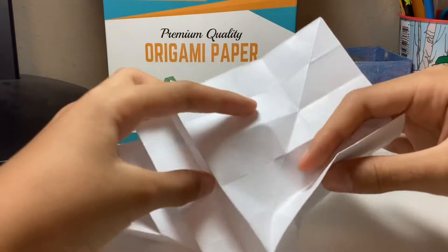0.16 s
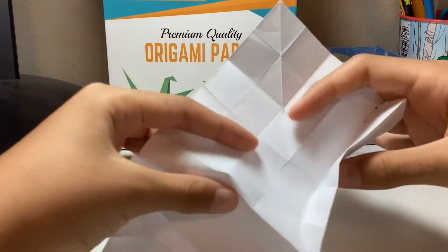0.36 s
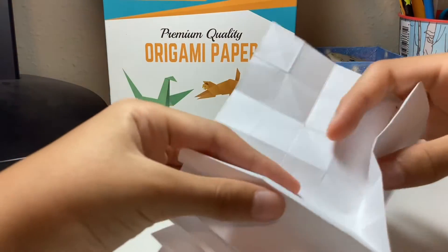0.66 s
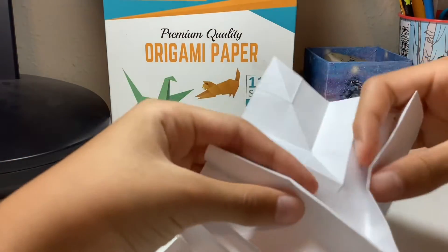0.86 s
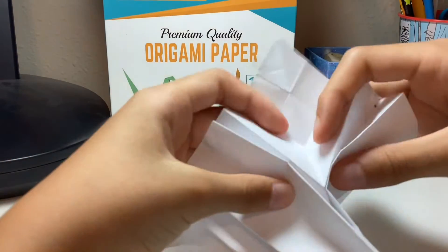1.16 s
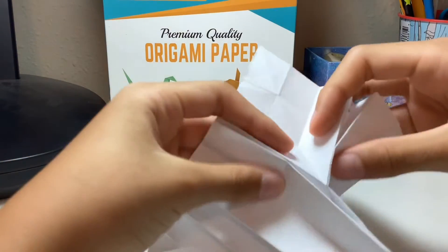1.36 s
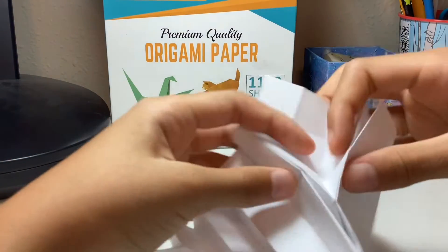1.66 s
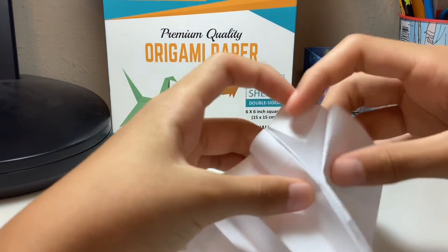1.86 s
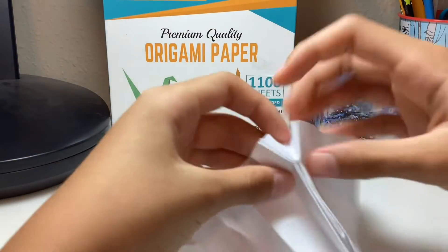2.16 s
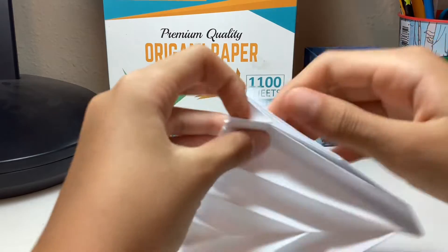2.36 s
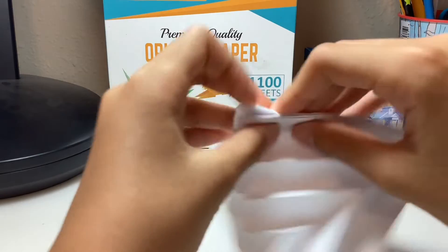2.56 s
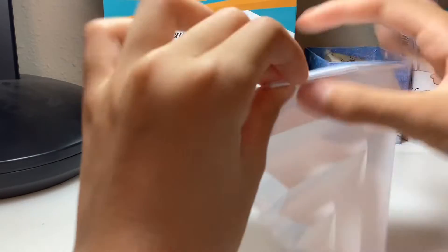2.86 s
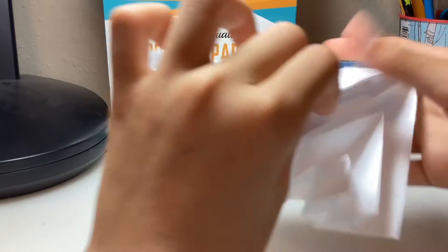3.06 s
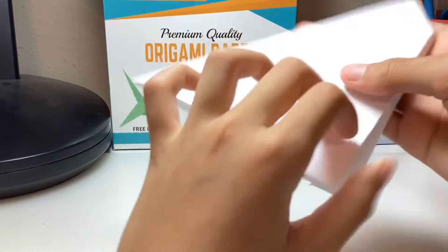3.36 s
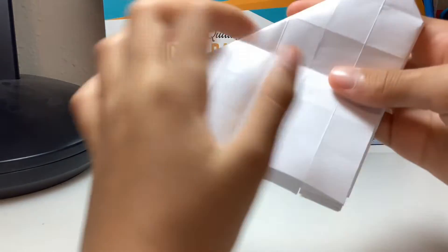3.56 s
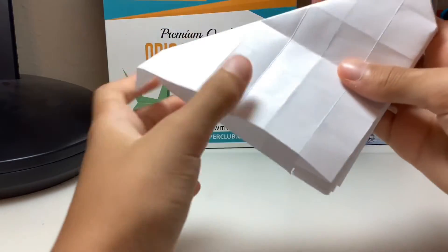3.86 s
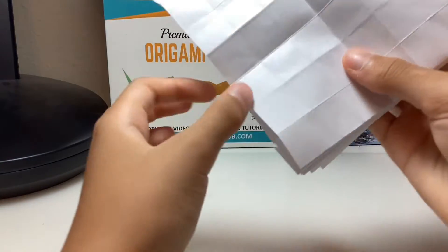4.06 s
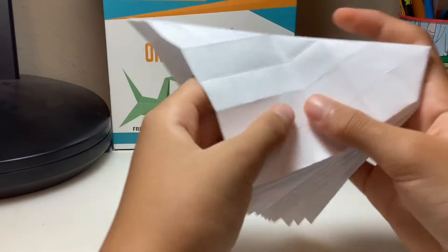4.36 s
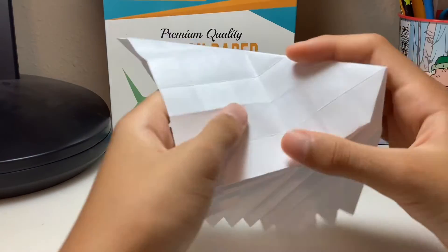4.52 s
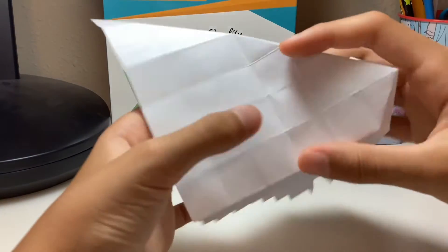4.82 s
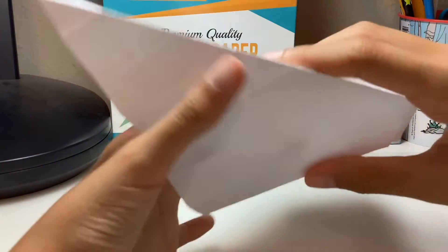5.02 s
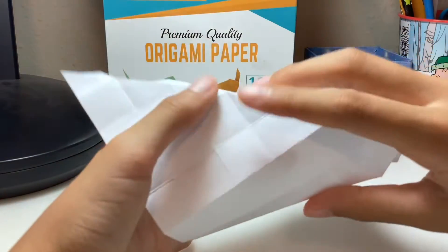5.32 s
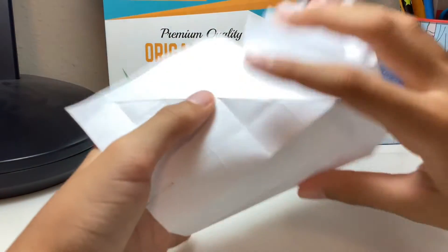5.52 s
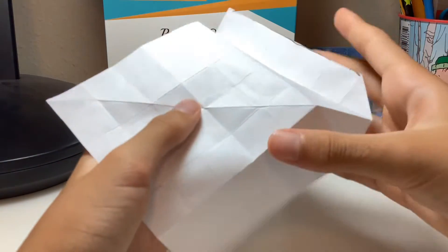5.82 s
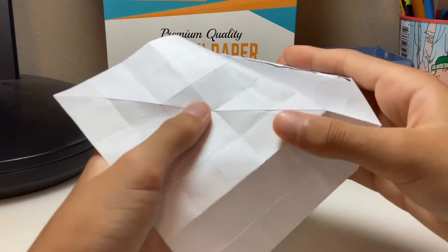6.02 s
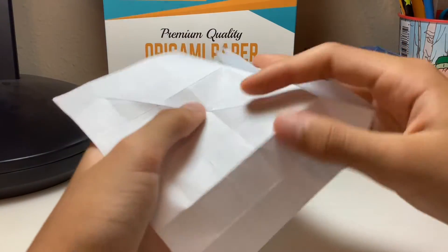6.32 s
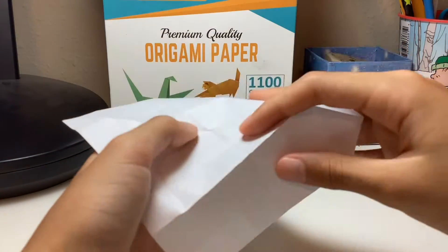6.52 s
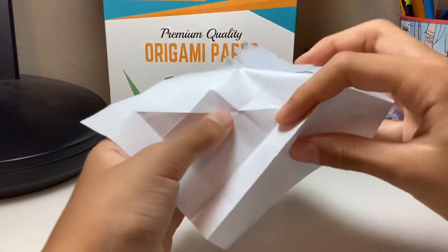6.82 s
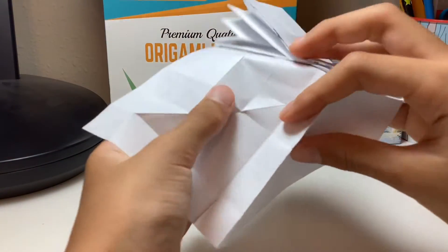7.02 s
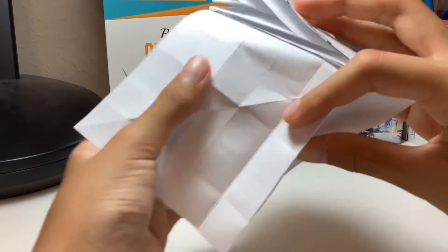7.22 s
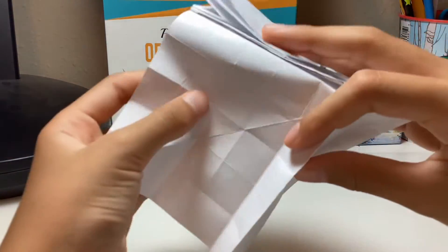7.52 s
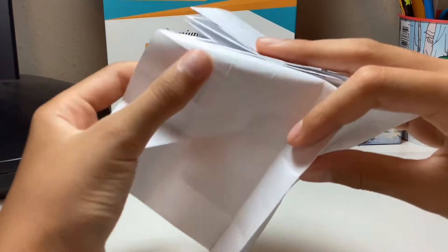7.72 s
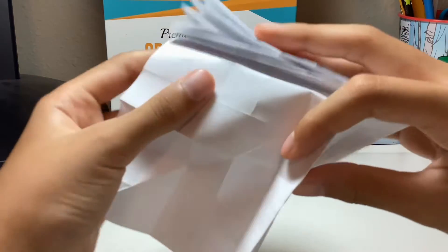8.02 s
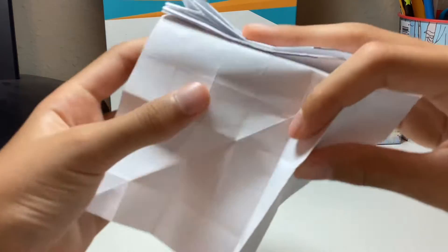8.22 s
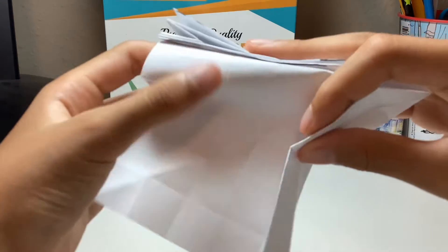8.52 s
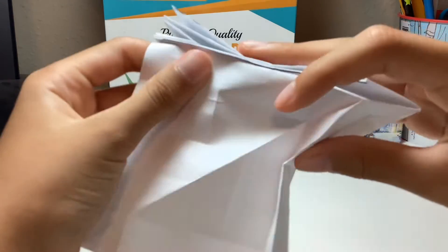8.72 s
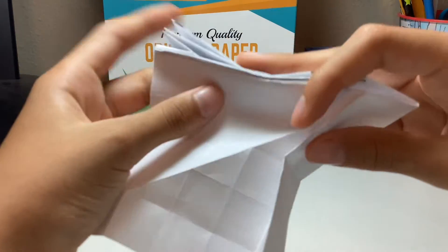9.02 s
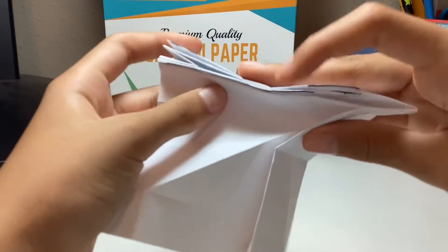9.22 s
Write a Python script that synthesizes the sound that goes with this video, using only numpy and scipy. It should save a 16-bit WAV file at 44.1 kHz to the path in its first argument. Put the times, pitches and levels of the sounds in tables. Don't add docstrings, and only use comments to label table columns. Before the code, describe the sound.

Close, dry, mono sound of hands creasing a layered sheet: fingertip hiss, rustling layers, papery ticks and hard bright snaps. Activity is dense for three seconds, eases to near quiet around four, returns with crackle clusters around five, single snaps at six and seven, then the strongest flurry after eight. Very faint low mains hum and room air beneath.

```python
import sys
import numpy as np
from scipy import signal
from scipy.fft import rfft, irfft
from scipy.io import wavfile
from scipy.ndimage import uniform_filter1d

SR = 44100
rng = np.random.default_rng(int(sys.argv[2]) if len(sys.argv) > 2 else 0)


def makeup_ratio(level_db):
    decades = np.asarray(level_db, float) / 20
    return 10 ** decades


def int16_out(signal):
    q = np.round(np.clip(np.atleast_2d(signal).T, -1, 1) * 32767)
    wavfile.write(sys.argv[1], SR, q.astype(np.int16))


N = 413658


def curve(table, hz):
    table_hz, table_db = np.transpose(table)
    return np.interp(np.log(hz + 1), np.log(table_hz), table_db)


def unit(x):
    return x / np.sqrt(np.mean(x ** 2))


def colour(x, db_of):
    size = 4096
    cepstrum = irfft(db_of(np.fft.rfftfreq(size, 1 / SR)) * np.log(10) / 20)
    cepstrum[1:size // 2] *= 2
    cepstrum[size // 2 + 1:] = 0
    impulse = irfft(np.exp(rfft(cepstrum)))
    return signal.fftconvolve(x, impulse)[:len(x)]


def band(x, low_hz, high_hz):
    return signal.sosfilt(signal.butter(2, [low_hz, high_hz], "band", fs=SR, output="sos"), x)


def walk(rate_hz):
    hold = int(SR / rate_hz)
    steps = np.repeat(rng.standard_normal(N // hold + 1), hold)
    return 1.28 * uniform_filter1d(steps, hold)[:N]


# centre_hz, width_hz, gain_db
PATH = [(600, 90, 7), (1050, 130, 6), (1335, 110, 10), (1480, 100, -5), (2140, 280, 8), (4480, 200, 5),
        (4800, 250, -4), (5350, 500, 4), (6040, 260, 7), (6260, 220, -8)]


def path_db(hz):
    return sum(db / (1 + (2 * (hz - centre) / width) ** 2) for centre, width, db in PATH)


# freq_hz, level_db
AIR_TILT = [(18, -31.5), (30, -30.5), (53, -13.5), (118, -2), (157, -7.5), (199, -15.5), (394, -30.5),
            (3770, -46.5), (16000, -67.5)]
# multiple, level_db
HUM = [(1, -62), (2, -71)]


def room_air():
    noise = colour(rng.standard_normal(N), lambda hz: curve(AIR_TILT, hz))
    air = unit(noise) * makeup_ratio(-59)
    hum_hz = 120
    phase = 2 * np.pi * hum_hz * np.arange(N) / SR + 0.8 * walk(12)
    for multiple, level_db in HUM:
        air = air + np.sqrt(2) * np.sin(multiple * phase) * makeup_ratio(level_db + 2.6 * walk(21))
    return air


# start_s, hiss_db
HOLDING = [(0.0, -73.5), (0.78, -60), (1.56, -60.5), (2.35, -64.5), (3.13, -68.5), (3.91, -78),
           (4.69, -66.5), (5.47, -72.5), (6.25, -74), (7.04, -68), (7.82, -67), (8.6, -69.5), (9.38, -67)]
# start_s, length_s, hiss_db
BENDS = [(0.0, 0.015, -59.5), (0.195, 0.12, -55), (0.314, 0.054, -55), (4.62, 0.096, -66),
         (5.054, 0.068, -57), (5.413, 0.075, -67), (5.517, 0.066, -61), (5.991, 0.056, -65),
         (6.111, 0.07, -65), (6.241, 0.07, -69.5), (6.585, 0.06, -70), (6.914, 0.044, -62.5),
         (6.989, 0.061, -65.5), (7.244, 0.073, -53), (7.328, 0.03, -55.5), (7.827, 0.086, -66),
         (7.982, 0.013, -59), (8.665, 0.025, -58), (8.69, 0.07, -53.5), (8.835, 0.038, -57.5)]
# start_s, length_s, hiss_db
DRAGS = [(0.065, 0.074, -59), (0.14, 0.023, -55), (8.826, 0.045, -56), (9.008, 0.008, -54),
         (0.364, 0.049, -55.5), (0.399, 0.1, -61.5), (0.698, 0.094, -53), (1.472, 0.14, -56.5),
         (1.956, 0.08, -53), (3.078, 0.12, -59), (3.228, 0.12, -56.5), (4.51, 0.054, -61),
         (4.854, 0.034, -55), (4.89, 0.035, -54.5), (4.922, 0.018, -51), (4.945, 0.02, -57),
         (4.964, 0.063, -63.5), (5.093, 0.044, -52), (5.218, 0.049, -55), (5.263, 0.071, -61.5),
         (5.343, 0.071, -57), (5.562, 0.093, -66.5), (5.907, 0.034, -62.5), (6.321, 0.025, -64),
         (6.495, 0.023, -62.5), (6.725, 0.07, -61), (7.383, 0.088, -56.5), (7.742, 0.081, -59.5),
         (8.122, 0.05, -53), (8.19, 0.018, -49.5), (8.222, 0.058, -53), (8.27, 0.21, -56),
         (8.312, 0.027, -47), (8.425, 0.07, -58), (9.184, 0.027, -60), (9.259, 0.081, -55.5)]
# start_s, length_s, hiss_db
RASPS = [
    (8.515, 0.044, -55),
    (0.203, 0.049, -53),
]
# start_s, length_s, hiss_db
SLIDES = [(0.489, 0.04, -52), (0.53, 0.06, -50.5), (0.6, 0.13, -50), (1.621, 0.091, -45.5),
          (2.085, 0.1, -51), (2.209, 0.024, -40), (2.335, 0.049, -46.5), (2.599, 0.125, -59.5),
          (2.859, 0.045, -58.5), (2.903, 0.023, -44.5), (3.357, 0.046, -49), (3.527, 0.039, -54),
          (3.577, 0.034, -59.5), (3.612, 0.032, -61), (3.92, 0.125, -59.5), (4.101, 0.132, -65),
          (4.245, 0.07, -59.5), (4.355, 0.19, -55.5), (5.637, 0.027, -53.5), (6.56, 0.025, -61),
          (6.815, 0.01, -43), (6.834, 0.059, -54), (6.969, 0.0205, -51), (7.159, 0.065, -54),
          (8.516, 0.036, -41), (8.561, 0.038, -47.5), (8.625, 0.029, -48.5), (8.87, 0.045, -52.5),
          (8.925, 0.015, -52), (8.95, 0.03, -52), (9.065, 0.05, -59.5), (4.68, 0.045, -63),
          (5.45, 0.02, -59.5), (9.234, 0.016, -41.5), (9.324, 0.054, -51)]
# start_s, length_s, hiss_db
STROKES = [(0.9, 0.023, -48.5), (0.935, 0.078, -53), (1.008, 0.02, -49), (1.045, 0.022, -51),
           (1.127, 0.15, -54.5), (1.287, 0.027, -46.5), (1.335, 0.06, -51), (1.4, 0.07, -49.5),
           (1.721, 0.065, -53.5), (1.786, 0.081, -50.5), (1.866, 0.15, -57.5), (2.24, 0.017, -55),
           (2.295, 0.067, -53), (2.39, 0.096, -57), (2.494, 0.029, -47), (2.53, 0.034, -45.5),
           (2.575, 0.024, -47.5), (2.724, 0.078, -53.5), (2.794, 0.071, -51), (3.018, 0.036, -52.5),
           (3.407, 0.15, -60), (4.285, 0.097, -63), (4.84, 0.03, -62.5), (5.473, 0.033, -66),
           (5.672, 0.12, -67), (6.346, 0.15, -54.5), (6.65, 0.077, -52), (6.884, 0.017, -49.5),
           (7.054, 0.048, -53.5), (7.495, 0.04, -52), (7.608, 0.078, -47), (7.683, 0.021, -56.5),
           (8.017, 0.12, -50), (8.341, 0.068, -53), (8.985, 0.012, -43.5)]


def contact():
    holding_rustle_db, attack_share, release_s, swell_db = 6, 0.16, 0.016, 1.5
    t = np.arange(N) / SR
    hiss = makeup_ratio(np.interp(t, *np.transpose(HOLDING)))
    rustle = hiss * makeup_ratio(holding_rustle_db)
    # events, rustle dB re hiss
    kinds = [(SLIDES, -2.2), (STROKES, 1), (DRAGS, 4.2), (BENDS, 8.9), (RASPS, 14.6)]
    for events, rustle_db in kinds:
        for start_s, length_s, hiss_db in events:
            attack_s = attack_share * length_s
            end_s = length_s + release_s
            span = slice(max(int((start_s - attack_s) * SR), 0), int((start_s + end_s) * SR))
            corners_s = [-attack_s, 0, length_s / 2, length_s, end_s]
            shape = np.interp(t[span] - start_s, corners_s, [0, 1, makeup_ratio(swell_db / 2), 1, 0])
            touch = makeup_ratio(hiss_db) * shape ** 2
            hiss[span] = np.maximum(hiss[span], touch)
            rustle[span] = np.maximum(rustle[span], touch * makeup_ratio(rustle_db))
    return 20 * np.log10([hiss, rustle])


# freq_hz, gain_db
RUB_TILT = [(100, -3.5), (250, 0.5), (900, -2.5), (3500, -1), (6100, -2), (6300, -4.5), (15500, -8.5)]


def rubbing():
    hiss_db, rustle_db = contact()
    smoothed_db = uniform_filter1d(rustle_db, 1200)
    flap_db = -40.5 + 0.57 * (smoothed_db + 52.5) + 2.6 * walk(35)
    grip_db = np.clip(walk(45) + 2.6 * walk(220), -8, 5)
    slips = makeup_ratio(np.minimum(3.3 * rng.exponential(size=N), 17) + grip_db - 6)
    crackles_per_s, crackle_base_db, crackle_spread_db = 120, 17, 3.0
    at = np.flatnonzero(rng.random(N) < crackles_per_s / SR)
    excess_db = np.minimum(crackle_spread_db * rng.exponential(size=len(at)), 9)
    crackle_db = crackle_base_db + excess_db
    centre = rng.uniform(np.log(500), np.log(9000), len(at))
    out = 0
    for hz in 160 * 1.17 ** np.arange(30):
        flap = np.interp(np.log(hz), np.log([450, 900]), [1, 0])
        hiss = np.interp(np.log(hz), np.log([2200, 5000]), [0, 1])
        level_db = flap * flap_db + hiss * (hiss_db + 7.0) + (1 - flap - hiss) * (rustle_db + 7.5)
        push = slips * rng.standard_normal(N)
        push[at] += makeup_ratio(crackle_db - 12 * (np.log(hz) - centre) ** 2)
        out = out + band(push, hz, 1.17 * hz) * makeup_ratio(level_db + 2.5 * walk(28))
    return colour(out, lambda hz: curve(RUB_TILT, hz) + 0.8 * path_db(hz))


def strike(size, peak_db, hz, t60_s, mode_db):
    t = np.arange(size) / SR
    rise_cycles = 0.85
    swell = (1 - np.exp(-t * hz / rise_cycles)) * np.exp(-np.log(1000) * t / t60_s)
    modes = np.sin(2 * np.pi * (hz * t + rng.random(hz.shape)))
    ring = np.sum(makeup_ratio(mode_db) * swell * modes, axis=0)
    return makeup_ratio(peak_db) * ring / np.abs(ring).max()


def lone_panel(size, peak_db, panel_hz):
    spread, cycles_to_t60 = 0.14, 17
    near, top = rng.random((2, 8, 1))
    panel_modes_hz = panel_hz * np.exp(spread * (2 * near[:4] - 1))
    hz = np.concatenate([panel_modes_hz, 3500 * 4.2 ** top])
    t60_s = cycles_to_t60 * (hz / 1000) ** 0.64 / hz
    crack_db = -11 if panel_hz > 3000 else -21.5
    mode_db = np.repeat([0, crack_db], [4, 8])[:, None]
    return strike(size, peak_db - 4, hz, t60_s, mode_db)


def big_snap(size, peak_db, peaks):
    hz, width_hz, gain_db = np.array(peaks, float).T[:, :, None]
    t60_s = np.log(1000) / (np.pi * width_hz)
    return strike(size, peak_db, hz, t60_s, gain_db + 20 * np.log10(width_hz))


# start_s, peak_db, panel_hz
LONE_PANELS = [(0.0, -33, 604), (0.608, -36, 623), (0.73, -33, 450), (0.852, -34, 650), (1.019, -39, 300),
               (1.264, -30.5, 603), (8.325, -23.5, 385), (1.339, -31, 505), (1.518, -33, 800), (1.951, -35, 350),
               (1.97, -28.5, 500), (2.161, -39, 300), (2.377, -38, 320), (2.817, -31, 560), (2.838, -33, 330),
               (2.919, -36, 330), (3.017, -32.5, 517), (3.17, -38, 600), (3.925, -38.5, 487), (4.5, -38, 1340),
               (4.871, -35, 330), (8.542, -13.5, 2230), (4.964, -33, 480), (5.045, -25, 490), (5.108, -28, 322),
               (5.282, -28, 1320), (6.246, -41, 640), (7.335, -31, 606), (7.439, -38, 647), (7.551, -24, 650),
               (7.771, -28, 350), (7.905, -33, 400), (8.073, -27, 660), (8.482, -34, 560), (8.703, -23, 600),
               (8.731, -32, 664),
               (0.063, -42, 1340), (0.098, -26, 1320), (0.118, -35, 2130), (0.681, -13.5, 2530),
                (1.059, -34, 1300), (1.327, -26, 1090), (1.496, -40, 1060), (1.635, -24, 940),
                (1.644, -26, 1030), (1.79, -30, 1330), (2.098, -34, 970), (2.327, -26, 5000),
                (2.348, -30, 4050), (2.381, -20.5, 5490), (3.082, -33.5, 1070), (3.154, -30, 2110),
                (3.231, -30, 2220), (3.524, -37, 1010), (3.642, -40.5, 820), (3.392, -29, 4000),
                (3.915, -27.5, 2120), (4.342, -40, 800), (4.414, -39, 1340), (4.679, -39, 750),
                (4.927, -29, 970), (5.008, -26.5, 5230),
               (5.48, -38, 2110), (5.507, -36, 2130), (5.625, -31.5, 2120), (5.858, -37, 1700),
               (6.235, -24.5, 1780), (6.575, -40, 2800), (6.783, -31, 1090), (6.924, -33, 1340),
               (7.127, -35, 2020), (7.219, -38, 1270), (7.301, -26, 1350), (7.395, -27, 2200),
               (7.693, -37, 2350), (7.596, -30, 650), (7.818, -22, 2200), (7.87, -32.5, 4720),
               (7.964, -40, 1310), (8.017, -12.5, 2200), (8.223, -33, 1200), (8.315, -21, 1090),
               (8.427, -34, 710), (8.449, -25, 1200), (8.575, -39, 1360), (8.69, -15, 2160),
               (8.993, -36, 1030), (9.054, -28, 2260), (9.106, -37, 1050),
               (0.121, -34, 300), (0.22, -26, 2140), (0.682, -35, 320), (0.699, -27, 616), (1.176, -34, 280),
          (1.598, -35, 250), (1.982, -34, 1900), (2.031, -31, 333), (2.222, -22, 3480), (2.494, -29, 260),
          (5.061, -22.5, 1905), (7.248, -32, 1300), (7.286, -27.5, 1900), (8.07, -29, 2000),
          (8.516, -16, 5900), (8.533, -23, 2300), (8.537, -24, 1900)]
# [(centre_hz, width_hz, gain_db)]
BIG_SNAPS = [
    (0.3213, -5.5, [(1380, 91, 2), (2090, 270, 0), (955, 100, -9), (10050, 1900, -14.5), (5900, 300, -7), (7700, 500, -14)]),
    (0.6804, -10, [(2100, 120, 0), (2530, 220, -1.5), (3290, 210, -16.5), (3470, 150, -17), (6040, 110, 0.5)]),
    (5.520, -19.5, [(602, 98, -4.5), (1332, 64, -1), (2020, 110, -9.5), (2530, 100, -8), (3330, 190, -17)]),
    (6.0934, -11.5, [(1290, 64, -5.5), (1790, 65, -17), (2136, 120, -3), (2740, 230, -13), (5040, 210, -25)]),
    (8.017, -15.5, [(1325, 72, 1.5), (2180, 170, 2), (3440, 220, -23), (4400, 190, -19)]),
    (8.703, -6.5, [(608, 120, 2), (1080, 93, -1), (2820, 560, 0.5), (4400, 350, 0), (5800, 330, -25), (2080, 220, -6)]),
    (8.979, -24.5, [(1320, 82, -15), (2050, 150, -1), (3780, 130, 1), (5600, 95, -11)]),
]


def panels():
    out, size = np.zeros(N + 4096), 2000
    lone_events = LONE_PANELS
    for voice, events in [(lone_panel, lone_events), (big_snap, BIG_SNAPS)]:
        for start_s, *settings in events:
            start = int(start_s * SR)
            out[start:start + size] += voice(size, *settings)
    return out[:N]


# freq_hz, gain_db
SNAP_TILT = [(150, -7), (300, 7), (3500, 13.5), (6100, 8), (6300, 4.5), (15500, -3.5)]


def snap(t, panel_hz, crack_db, thud_db, t60_s):
    modes = 64
    place, phase, size, late = rng.random((4, modes, 1))
    hz = 170 + 15300 * ((np.arange(modes)[:, None] + place) / modes) ** 1.9
    slow = np.sqrt(2000 / hz)
    mode_t60_s = t60_s * slow ** 0.62
    delay_s = slow * (0.00028 + 0.07845 * mode_t60_s * late ** 2)
    age_s = np.maximum(t - delay_s, 0)
    attack = 1 - np.exp(-age_s / (0.0001 * slow))
    swell = attack * np.exp(-np.log(1000) * age_s / mode_t60_s)
    shape_db = curve([(450, thud_db + 9.0), (panel_hz, 0), (6000, crack_db + 6.0)], hz)
    shape_db = shape_db + 6 / (1 + ((hz - panel_hz) / 250) ** 2)
    mode_db = shape_db + curve(SNAP_TILT, hz) + 10 * size
    ring = np.sum(makeup_ratio(mode_db) * swell * np.sin(2 * np.pi * (hz * age_s + 0.33 * phase)), axis=0)
    return ring / np.abs(ring).max()


# start_s, peak_db, panel_hz, crack_db (re peak)
TICKS = [(0.024, -37, 700, -46), (0.271, -36, 587, -27), (0.693, -32, 582, -32), (0.935, -36.5, 641, -26),
         (1.404, -27.5, 590, -15), (1.689, -22.5, 2350, 3), (2.654, -36.5, 564, -56), (2.693, -33, 622, 14),
         (3.288, -34.5, 1340, -18), (3.477, -37, 606, 9), (4.101, -36.5, 3160, -2), (4.483, -35, 1410, -23),
         (4.503, -38, 1300, -20), (5.107, -25, 395, -18), (5.008, -30, 330, -27), (5.872, -38, 1000, -8),
         (6.654, -29.5, 1100, 8), (7.708, -41, 460, -23), (8.096, -33.5, 412, -21), (8.223, -31, 1990, 28),
         (8.326, -29, 448, -21), (8.339, -31, 1030, -31), (8.52, -26, 2170, -1), (8.703, -17.5, 605, -1),
         (9.039, -39, 2040, 8), (9.172, -40, 2000, -5)]
# start_s, peak_db, panel_hz, crack_db (re peak)
BUCKLES = [(0.098, -20.5, 1520, -21), (0.146, -32, 1250, -17), (0.321, -9, 1570, -3), (1.1, -26, 1300, -8),
           (1.562, -29.5, 1380, 1), (1.677, -27, 750, -21), (1.787, -22.5, 1230, -16),
           (2.379, -28.5, 940, -24), (2.555, -27.5, 2150, -26), (2.722, -32, 680, -27),
           (3.016, -22.5, 1015, 0.5), (5.006, -19, 1920, -16), (5.061, -21.5, 1370, -30),
           (5.521, -19.5, 1360, -21.5), (5.725, -34, 2100, -4), (5.895, -34.5, 1030, -23),
           (5.921, -24, 2840, -18), (6.904, -20, 2160, -32), (7.158, -33.5, 2060, 0),
           (7.242, -31.5, 1100, -8), (7.273, -31, 2030, -27), (7.303, -13, 2220, -14.5),
           (7.551, -24.5, 2400, -27), (7.772, -24, 1030, -24), (7.815, -25.5, 2190, -5),
           (8.017, -20, 2230, -9), (8.246, -20, 2020, -29), (8.449, -27.5, 710, -23.5),
           (8.689, -19.5, 2270, -11), (8.979, -28, 2060, -3)]
# start_s, peak_db, panel_hz, crack_db (re peak)
FLIPS = [(0.681, -13.5, 2500, 0), (1.174, -23, 3400, -9.5), (1.328, -18.5, 1780, -22.5),
         (1.392, -26.5, 2300, -15.5), (1.619, -28.5, 2310, -5.5), (1.946, -27.5, 2880, -8),
         (1.969, -30, 1100, -15), (2.211, -26, 3480, 0.5), (2.472, -32.5, 1000, -11),
         (3.231, -32, 2300, -13), (3.914, -31.5, 2170, 9), (4.88, -23.5, 1470, -21),
         (5.286, -30.5, 2060, -38), (5.823, -39, 1380, -37), (5.858, -34, 950, -37),
         (6.094, -14.5, 2160, -21), (6.236, -23.5, 1480, -24), (6.602, -35, 1130, -38),
         (6.781, -24.5, 1930, -20), (7.385, -36, 2170, -17), (8.07, -24.5, 1020, -32),
         (8.19, -32, 1780, -3), (8.23, -28.5, 2000, -4), (8.316, -26.5, 1110, -15),
         (8.526, -20, 1950, -13.5), (8.542, -21, 2160, 0.5), (8.666, -27, 2000, -22),
         (8.703, -15.5, 1010, -6), (9.2, -32, 1090, 0), (9.237, -38, 1420, -27)]
# start_s, peak_db, panel_hz, crack_db (re peak)
POPS = [(0.898, -32.5, 991, -12), (1.127, -25, 940, -7.5), (1.242, -28, 2060, -4), (1.446, -21, 700, -3),
        (1.516, -29.5, 1060, -21), (1.587, -28, 3180, 1), (1.636, -21, 2200, -4), (2.029, -24, 1050, -26),
        (2.493, -34.5, 517, -10), (2.816, -25, 2080, 1), (2.837, -30, 480, -25), (2.964, -32.5, 875, -6),
        (2.982, -31, 770, -30), (3.154, -30.5, 2060, -5), (3.512, -41, 1080, -9), (5.045, -24, 1350, -26),
        (5.096, -26, 2000, 0), (5.218, -36, 2090, -8), (5.624, -29, 710, -21), (8.952, -38.5, 620, -14),
        (7.459, -34, 1330, -10), (7.595, -33, 1320, -25), (7.74, -33, 2160, -3), (7.89, -32, 720, -32),
        (7.911, -29, 2100, -5), (8.648, -30.5, 1000, -33), (8.73, -22, 1270, -2), (8.741, -19.5, 755, -22),
        (8.934, -37.5, 1830, -4), (9.055, -31.5, 1040, -1)]


def snaps():
    out, t = np.zeros(N + 4096), np.arange(2500) / SR
    # events, thud dB re peak, ring t60 s
    kinds = [(TICKS, -6.5, 0.01924), (BUCKLES, -11.5, 0.02206), (FLIPS, -23, 0.0225), (POPS, -2.6, 0.0209)]
    for events, thud_db, t60_s in kinds:
        for start_s, peak_db, panel_hz, crack_db in events:
            start = int(start_s * SR)
            ring = snap(t, panel_hz, crack_db, thud_db, t60_s)
            out[start:start + len(t)] += makeup_ratio(peak_db + 0.48) * ring
    return colour(out[:N], lambda hz: 0.6 * path_db(hz))


# start_s, peak_db
KNOCKS = [
    (5.119, -52),
    (7.309, -59),
]


def knocks():
    out, t = np.zeros(N), np.arange(5000) / SR
    thud = t / 0.0054 * np.exp(-t / 0.011) * np.sin(2 * np.pi * 75 * t)
    for start_s, peak_db in KNOCKS:
        start = int(start_s * SR)
        out[start:start + len(t)] += makeup_ratio(peak_db + 12.0) * thud
    return out


def room_tail(paper):
    t60_s, gap_s = 0.35, 0.004
    t = np.arange(SR // 4) / SR
    noise = band(rng.standard_normal(len(t)), 270.0, 8700.0)
    tail = unit(noise * np.exp(-np.log(1000) * t / t60_s) * (t > gap_s)) / np.sqrt(len(t))
    source = colour(paper, lambda hz: -0.6 * path_db(hz))
    return makeup_ratio(-24.5) * signal.fftconvolve(source, tail)[:N]


def scene():
    air = room_air()
    paper = rubbing() + panels() + snaps()
    return (paper + room_tail(paper) + knocks() + air)[None]


def top_cut(x):
    return signal.sosfilt(signal.butter(12, 15800, fs=SR, output="sos"), x)


def record(dry):
    heard = signal.sosfilt(signal.butter(5, 50, "high", fs=SR, output="sos"), dry)
    heard = signal.sosfilt(signal.ellip(10, 1, 60, 15950, fs=SR, output="sos"), heard)
    return top_cut(heard)


dry = scene()
out = record(dry)
int16_out(out)
```